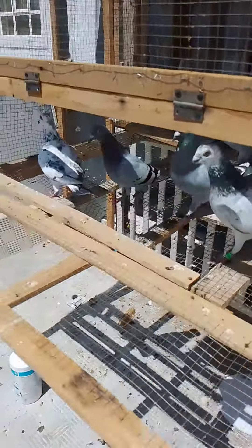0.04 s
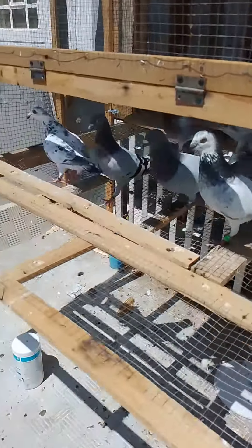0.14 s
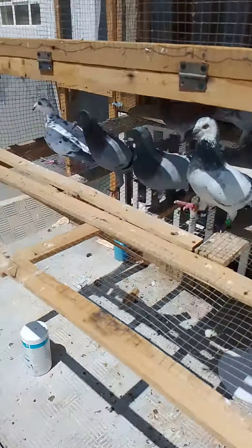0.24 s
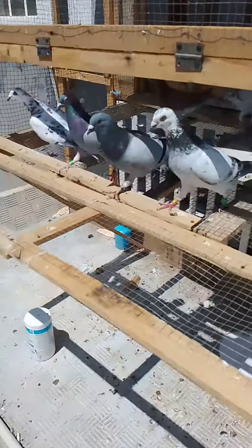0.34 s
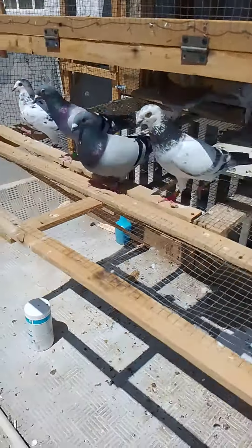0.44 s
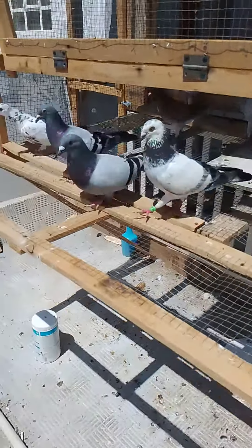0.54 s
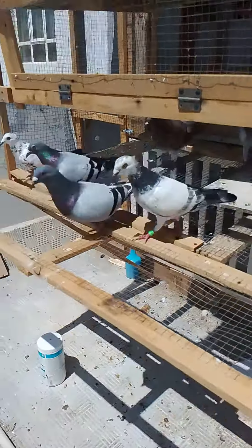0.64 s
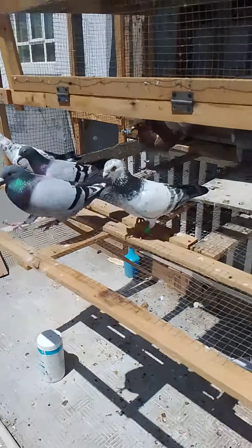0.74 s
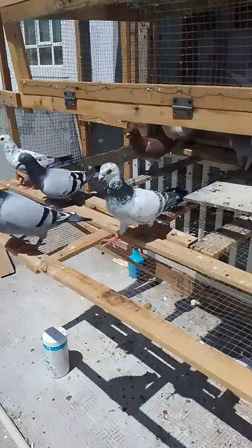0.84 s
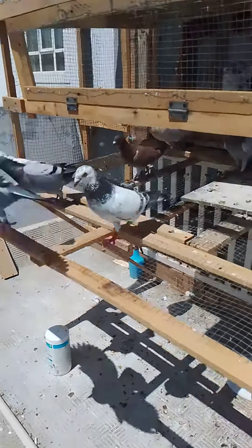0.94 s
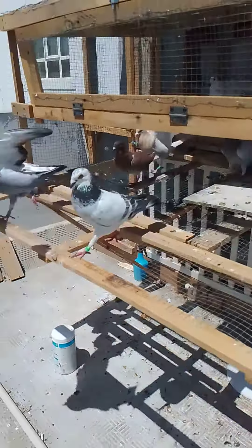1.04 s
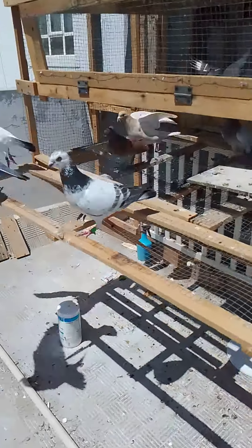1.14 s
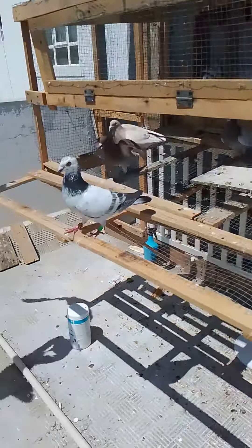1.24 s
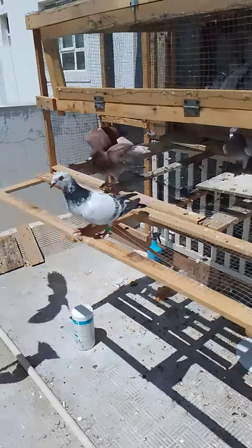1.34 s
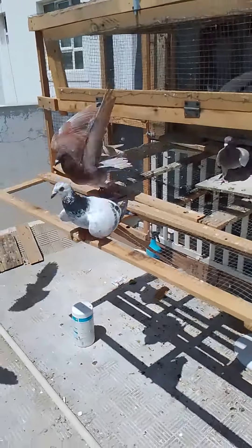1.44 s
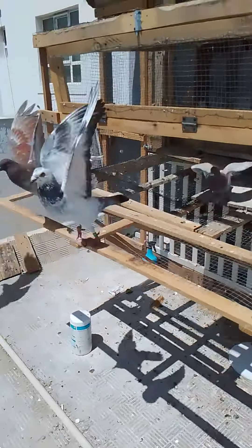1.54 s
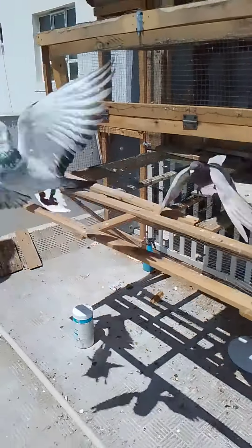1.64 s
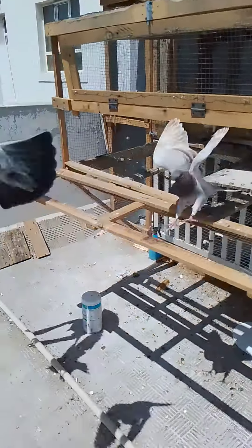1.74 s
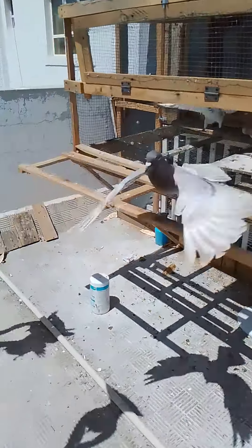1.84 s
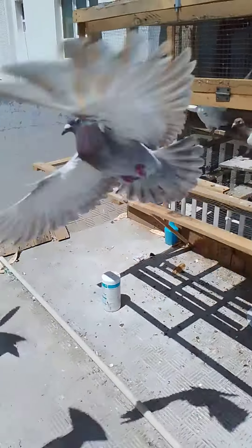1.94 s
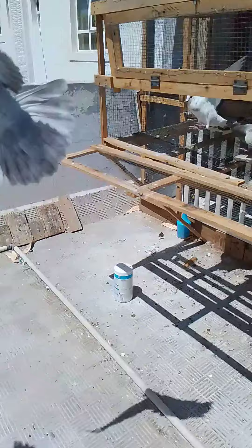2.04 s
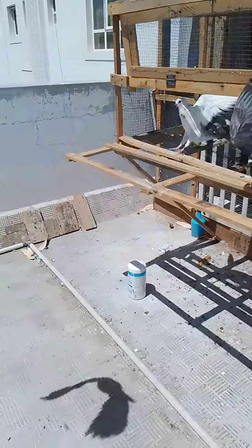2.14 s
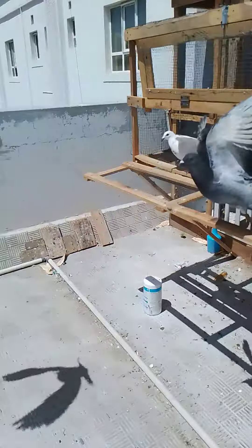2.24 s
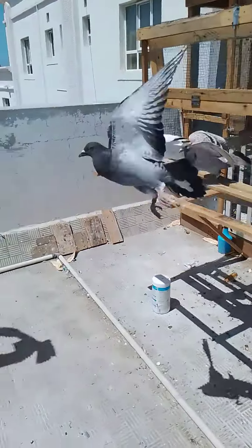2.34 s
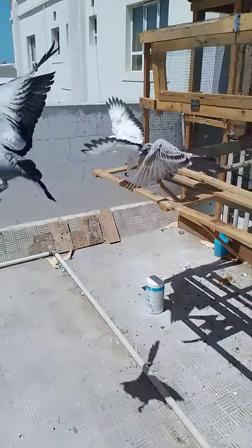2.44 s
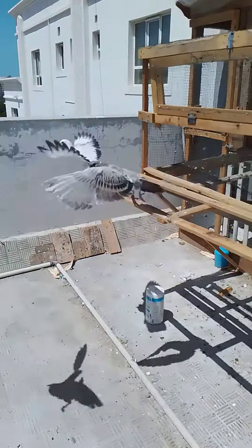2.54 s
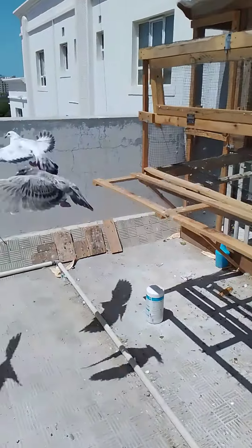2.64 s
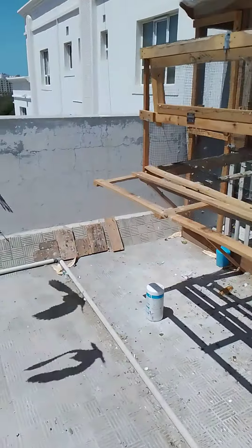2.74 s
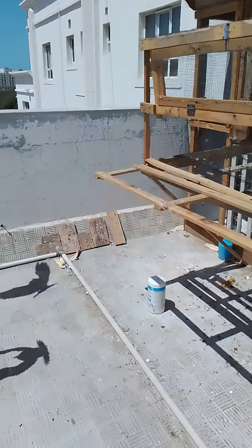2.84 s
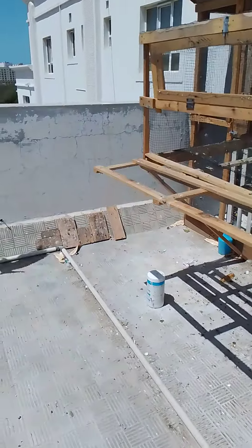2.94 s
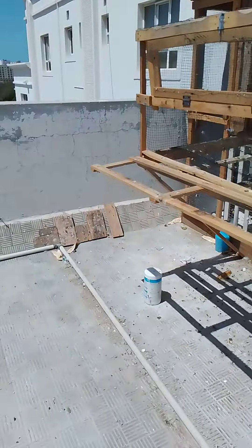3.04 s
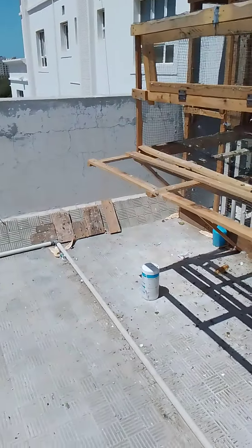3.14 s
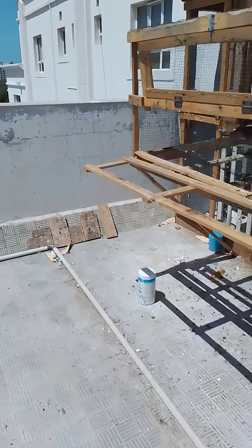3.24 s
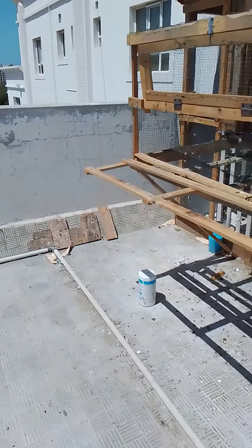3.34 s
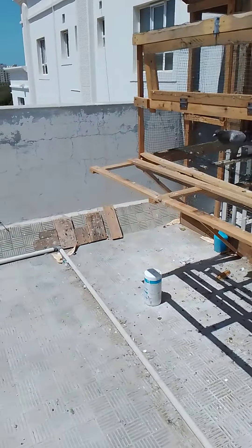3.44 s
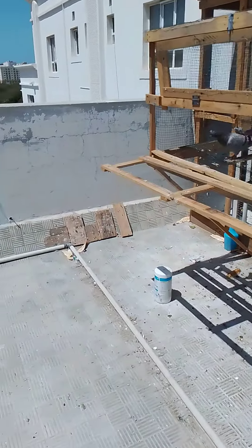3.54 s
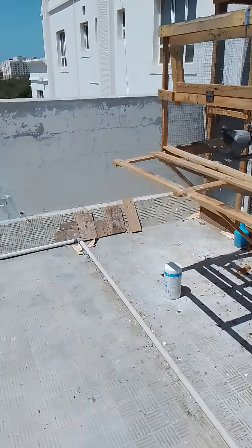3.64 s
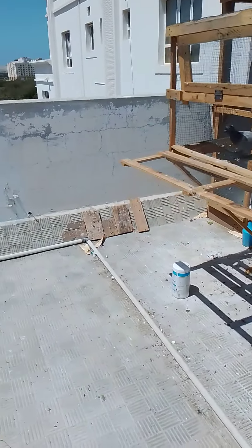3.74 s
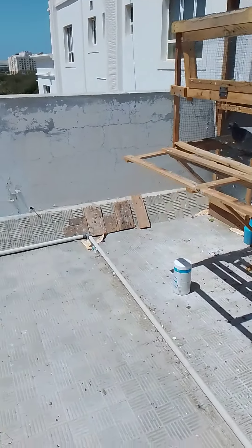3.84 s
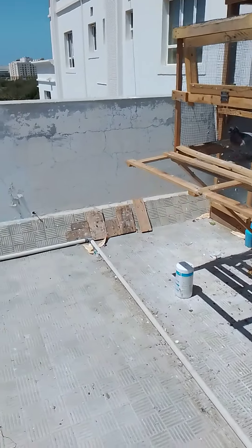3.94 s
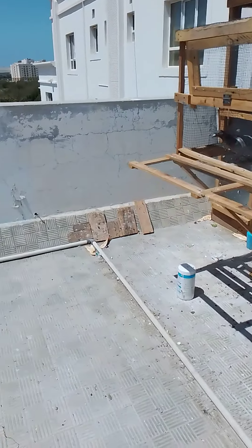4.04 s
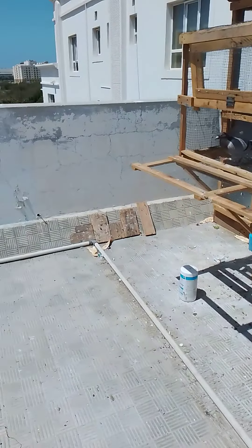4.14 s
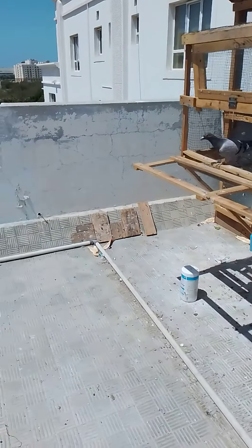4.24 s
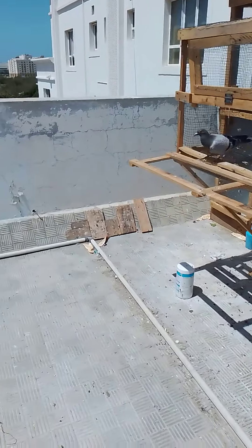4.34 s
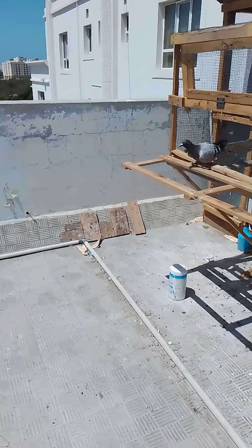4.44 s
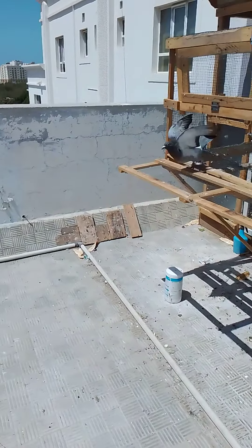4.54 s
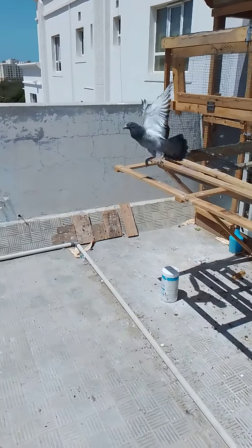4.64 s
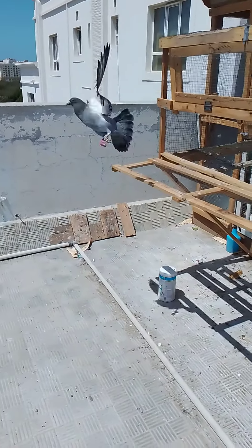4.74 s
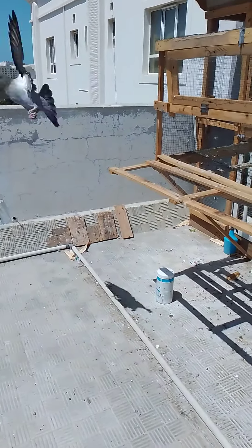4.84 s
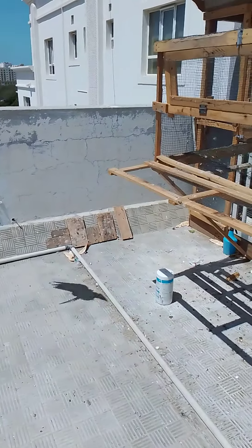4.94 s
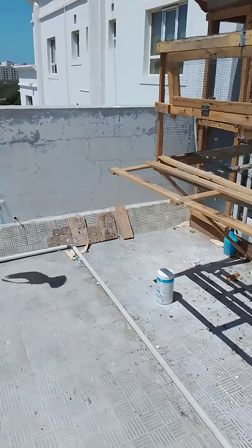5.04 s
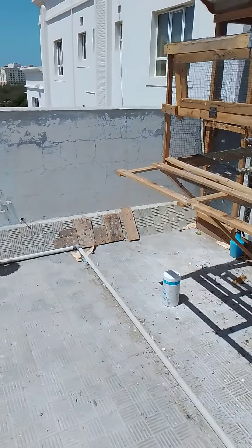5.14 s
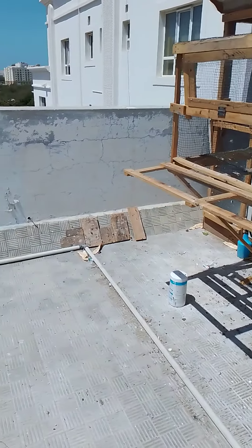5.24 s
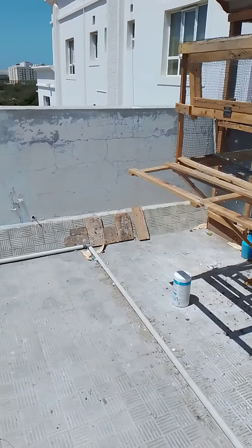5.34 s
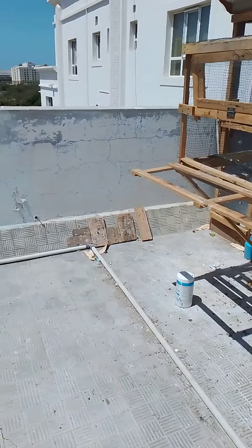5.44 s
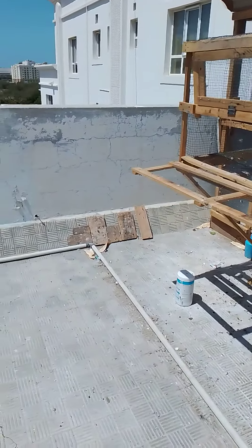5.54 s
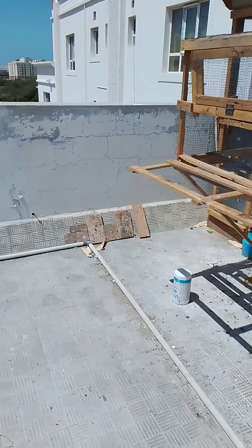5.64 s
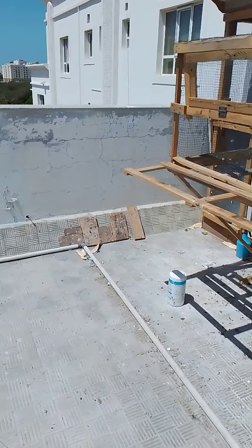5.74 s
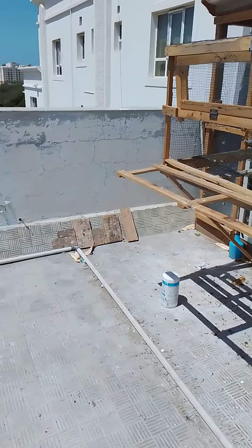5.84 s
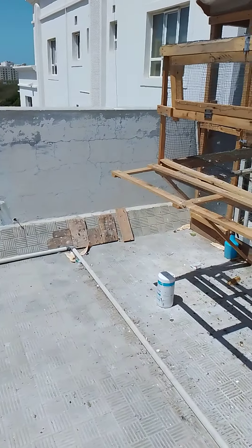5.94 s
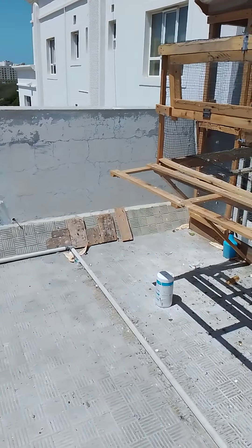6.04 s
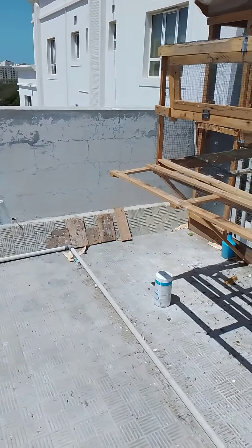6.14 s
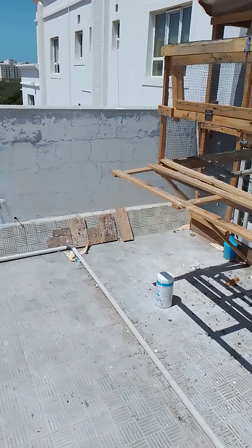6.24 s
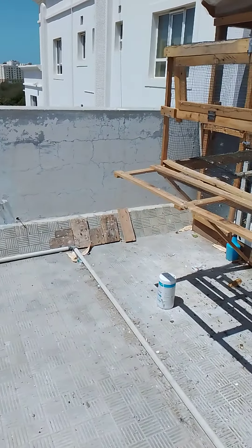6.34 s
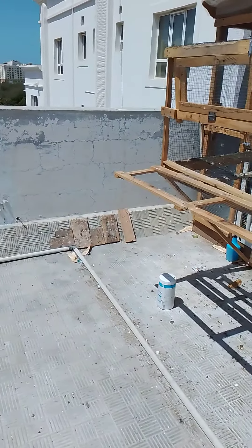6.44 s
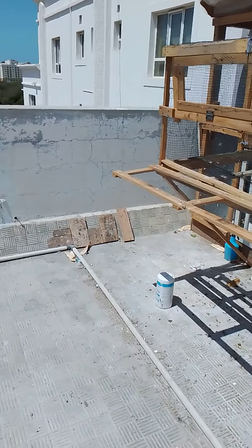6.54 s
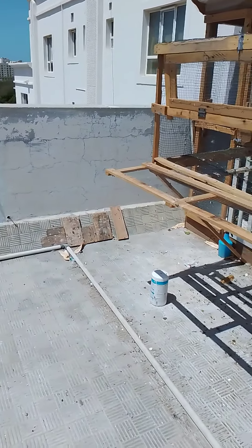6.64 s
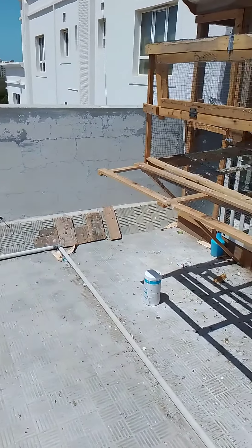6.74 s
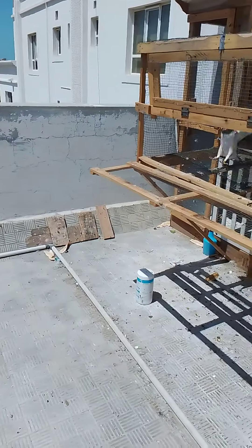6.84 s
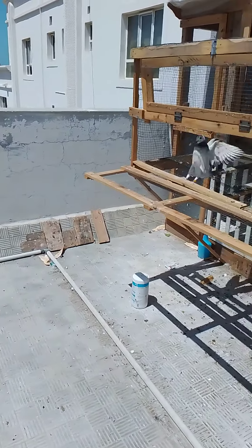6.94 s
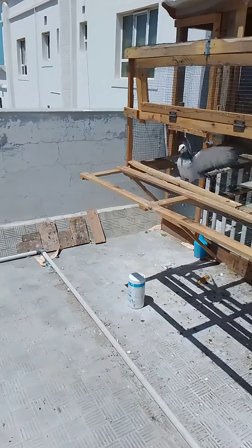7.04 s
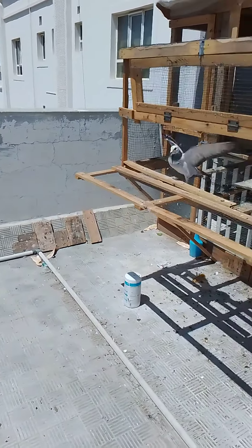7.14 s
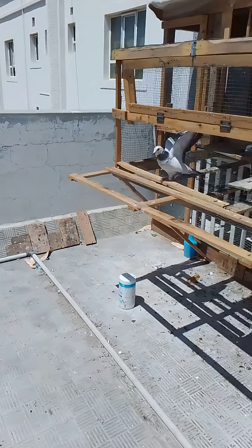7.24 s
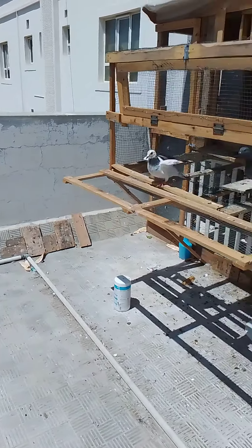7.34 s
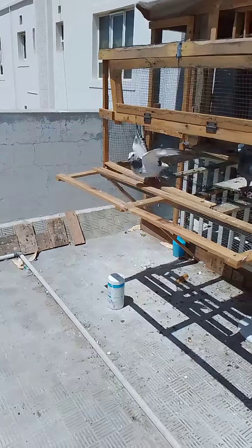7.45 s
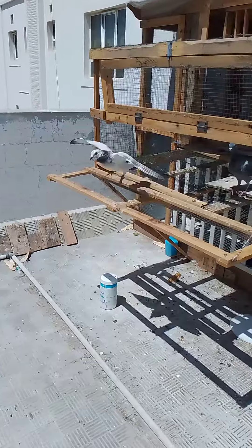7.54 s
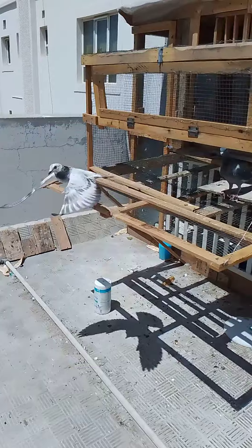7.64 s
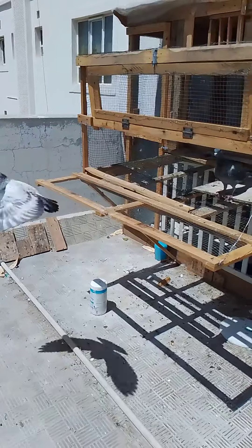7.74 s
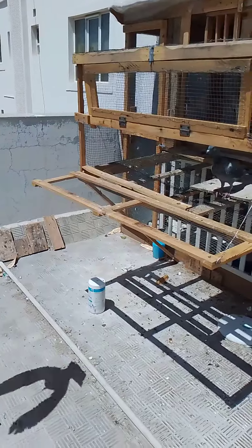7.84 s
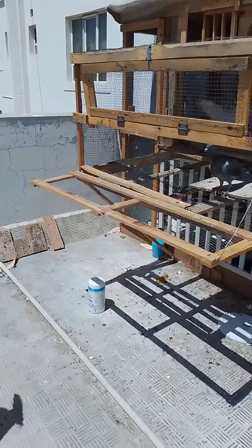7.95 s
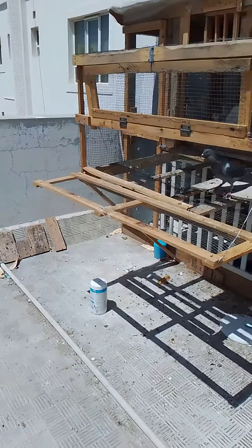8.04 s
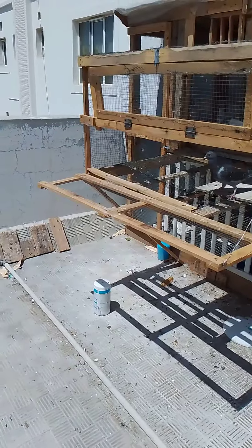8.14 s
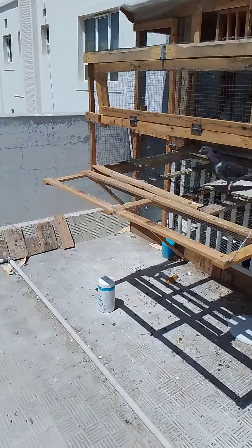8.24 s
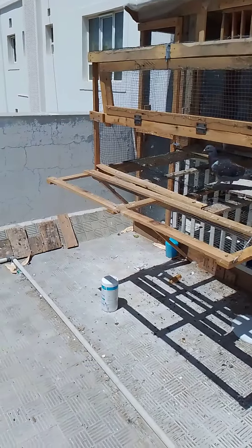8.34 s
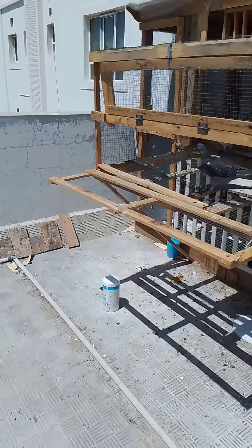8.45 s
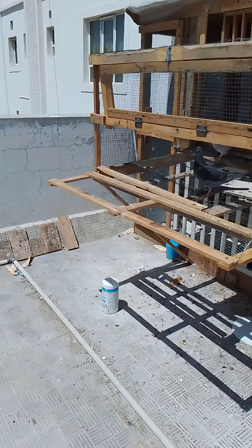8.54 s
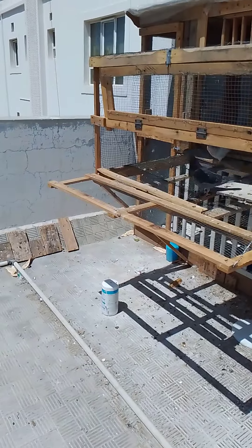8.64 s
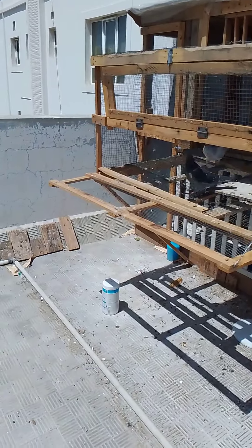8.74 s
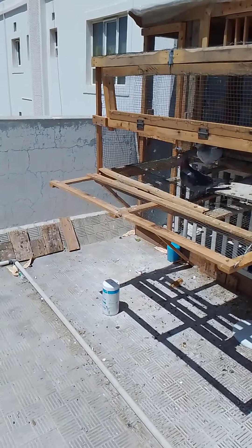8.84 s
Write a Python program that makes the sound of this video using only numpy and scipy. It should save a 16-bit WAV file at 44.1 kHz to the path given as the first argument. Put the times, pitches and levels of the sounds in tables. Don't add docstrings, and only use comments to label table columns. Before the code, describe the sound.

Pigeons burst from a wooden rooftop loft with sharp wing claps and feathery swishes, thin out, then one last bird claps past close by.

```python
import sys
import numpy as np
from scipy import signal
from scipy.fft import rfft, irfft
from scipy.io import wavfile

SR = 44100
rng = np.random.default_rng(int(sys.argv[2]) if len(sys.argv) > 2 else 0)


def generate_wav(signal):
    frames = np.transpose(np.atleast_2d(signal))
    scaled = np.clip(frames, -1, 1) * 32767
    pcm = np.round(scaled).astype(np.int16)
    wavfile.write(sys.argv[1], SR, pcm)


def field_ratio(decibels):
    return 10 ** (np.asarray(decibels, dtype=float) / 20)


N = 392931


def rms_one(x):
    return x / np.sqrt(np.mean(x ** 2) + 1e-20)


def in_time(rows):
    s, *columns = np.transpose(rows)
    return [np.interp(np.arange(N) / SR, s, c) for c in columns]


def band(x, low_hz, high_hz, order=2):
    return signal.sosfilt(signal.butter(order, [low_hz, high_hz], "band", fs=SR, output="sos"), x)


def coloured(x, points, size=8192):
    hz = np.maximum(np.arange(size // 2 + 1) * SR / size, 1)
    point_hz, point_db = np.array(points)[:, 0], np.array(points)[:, 1]
    log_gain = np.log(field_ratio(np.interp(np.log(hz), np.log(point_hz), point_db)))
    cepstrum = irfft(log_gain)
    cepstrum[1:size // 2] *= 2
    cepstrum[size // 2 + 1:] = 0
    response = irfft(np.exp(rfft(cepstrum)))
    response = response.reshape((1,) * (x.ndim - 1) + (-1,))
    return signal.fftconvolve(x, response, axes=-1)[..., :x.shape[-1]]


def drift(rate_hz):
    r = np.exp(-80 * np.pi * rate_hz / SR)
    slow = signal.lfilter([1], [1, -2 * r, r * r], rng.standard_normal(N // 40 + 2002))[2000:]
    return np.interp(np.arange(N) / 40, np.arange(len(slow)), rms_one(slow))


def resonance(x, hz, width_hz):
    r = np.exp(-np.pi * width_hz / SR)
    poles = [1, -2 * r * np.cos(2 * np.pi * hz / SR), r * r]
    return signal.lfilter([(1 - r * r) / 2, 0, (r * r - 1) / 2], poles, x)


def add(out, s, sound):
    at = round(s * SR)
    out[at:at + len(sound)] += sound[:N - at]


# frequency in Hz, density in dB per Hz.
PLUMAGE_TONE = [(110, -65), (190, -9.5), (233, -2.5), (302, 1.5), (671, -5), (1010, 1.5), (1550, 1.5),
                (2800, 3.5), (4050, -2), (4790, -10.5), (5460, -11), (7340, -22.5), (9340, -19),
                (12300, -31.5), (16000, -31)]


def plumage(x):
    return coloured(x, PLUMAGE_TONE)


# time in seconds, rush in dB, nearness in dB.
FLOCK_EFFORT = [(0.0, -38.5, 0.5), (0.79, -37, 3), (0.97, -37, 2.5), (1.29, -29, 1), (2.21, -28.5, 0.5),
                (3.38, -37.5, -1.5), (3.8, -37.5, 1), (4.0, -40.5, -1), (4.27, -41.5, -1.5),
                (4.57, -40.5, 1.5), (4.86, -38.5, -1), (5.58, -36, 0), (6.16, -40, -1.5), (7.62, -39, -0.5),
                (7.84, -37, 1), (8.22, -34.5, 0), (8.61, -38.5, -2), (8.91, -36, -1)]
CALM_DB = -39
# low edge in Hz, high edge in Hz, centre in Hz.
RUSH_ZONES = [
    (190, 800, 390),
    (800, 4500, 1900),
    (4500, 16000, 7000),
]


def rush():
    mid_db, near_db = in_time(FLOCK_EFFORT)
    effort_db = mid_db - CALM_DB
    thrust_db = -46.5 + effort_db - 0.68 * near_db
    hiss_db = -59 + 1.44 * effort_db + near_db
    slips = rng.random((2, N)) < 500 / SR
    rustle = slips * field_ratio(4.4 * np.minimum(rng.exponential(1, (2, N)), 3.5))
    white = rng.standard_normal((2, N)) * (1 + 1.34 * signal.lfilter([.2], [1, -.9], rustle))
    white = plumage(white)
    beats = np.minimum(drift(38), 1.2)
    zone_db = []
    for level_db, (low, high, _) in zip([thrust_db, mid_db, hiss_db], RUSH_ZONES):
        power = np.mean(band(white[0], low, high, order=4) ** 2)
        zone_db.append(level_db - 10 * np.log10(power))
    log_centres = np.log(np.array(RUSH_ZONES)[:, 2])
    out, edges = 0, np.geomspace(190, 17000, 15)
    for k in range(14):
        place = np.interp(np.log(edges[k] * edges[k + 1]) / 2, log_centres, [0, 1, 2])
        level_db = sum(max(0, 1 - abs(place - zone)) * zone_db[zone] for zone in range(3))
        flutter_db = (0.5 + 0.18 * k) * beats + 1.03 * np.clip(drift(42.0), -3, 1.8)
        out = out + field_ratio(level_db - 2.0 + flutter_db) * band(white[k % 2], *edges[k:k + 2])
    return out


def quills():
    per_second, cycles = 300, 11
    born = (rng.random(N) < per_second / SR) * rng.standard_normal(N)
    pitches, dealt = np.geomspace(550, 2200, 12), rng.integers(0, 12, N)
    buzz = 0
    for k, hz in enumerate(pitches):
        struck = born * (dealt == k) + 1e-18
        buzz = buzz + resonance(resonance(struck, hz, hz / cycles), hz, hz / cycles)
    return field_ratio(-60 + 2.0 * (in_time(FLOCK_EFFORT)[0] - CALM_DB)) * rms_one(buzz)


# frequency in Hz, density in dB per Hz.
TOWN_TONE = [(110, -42.5), (190, -7), (318, -1.5), (351, -8.5), (737, -3.5), (1000, -4), (1180, -1.5),
             (2400, -15), (9000, -59), (11700, -96), (19800, -120)]


def town():
    return field_ratio(-45.5) * rms_one(coloured(rng.standard_normal(N), TOWN_TONE))


# time in seconds, level in dB.
RUMBLE_SWELL = [(0.0, -60), (0.62, -62), (2.01, -52), (4.52, -64), (5.53, -57), (5.73, -64.5),
                (7.67, -62.5), (7.82, -55), (8.91, -64)]
# frequency in Hz, density in dB per Hz.
RUMBLE_TONE = [(13, -40), (22, -27), (59, -4), (81, -3.5), (124, -5.5), (156, -12), (165, -2), (210, -41),
               (360, -120)]


def rumble():
    deep = coloured(rng.standard_normal(N), RUMBLE_TONE + [(230, -44.0)])
    return field_ratio(in_time(RUMBLE_SWELL)[0]) * rms_one(deep)


def claps(rows, size=6000):
    out, t = np.zeros(N), np.arange(size) / SR
    noise, tips = rng.standard_normal((len(rows), 2, size)), rng.random((len(rows), 8))
    shapes = np.zeros((len(rows), size))
    for k, (s, peak_db, ring_hz, snap_db, swish_db, ring_db) in enumerate(rows):
        tip_at = (tips[k, :4] * .005 * SR * [0, 1, 1, 1]).astype(int)
        cracks = np.zeros(size)
        cracks[tip_at] = field_ratio(-(1.5 + 11 * tips[k, 4:]) * [0, 1, 1, 1])
        swish = noise[k, 0] * field_ratio(swish_db - 10.0) * np.exp(-t / 0.02) * (1 - np.exp(-t / 0.00029))
        source = cracks + swish + 0.2 * noise[k, 1] * np.exp(-t / 0.0014)
        ring = resonance(source, ring_hz, 3000)
        ring = ring + field_ratio(ring_db) * resonance(source - 0.18 * swish, ring_hz, 280)
        snap = band(source - swish * (1 - np.exp(-t / 0.051)), 3600, 17000)
        shapes[k] = band(source, 220, 6200, order=1) + 0.53 * ring + field_ratio(snap_db + 21.5) * snap
    shapes = plumage(shapes)
    shapes /= np.abs(band(shapes, 1860, 13000)[:, :400]).max(axis=1, keepdims=True)
    for row, shape in zip(rows, shapes):
        add(out, row[0], field_ratio(row[1] - 2.0) * shape)
    return out


# start in seconds, peak in dB, ring of the cupped wing in Hz, snap in dB.
FLOCK_CLAPS = [(0.0277, -28, 2810, -20), (0.0547, -24, 2290, -48), (0.2148, -27, 2820, -30),
               (0.477, -23, 2470, -36), (0.977, -18.5, 3020, -44), (1.047, -23.5, 1640, -44),
               (1.1136, -14, 1720, -27), (1.14, -16, 2780, -33), (1.2112, -5.5, 2760, -13.5),
               (1.224, -10, 940, -30), (1.3292, -10, 2700, -30), (1.495, -10.5, 3160, -12.5),
               (1.5503, -24, 2070, -34), (1.5899, -20, 1380, -36), (1.8067, -18, 2100, -25),
               (1.86, -20.5, 1910, -26), (2.018, -31, 1910, -35), (2.149, -19, 2800, -22),
               (2.163, -15, 2360, -14), (2.282, -18, 1010, -23), (2.3266, -21, 940, -20),
               (2.388, -31, 2810, -23), (2.5939, -17, 1610, -21), (2.6266, -19, 2000, -14),
               (2.6891, -22, 2090, -13), (2.7486, -21, 2950, -20), (2.9359, -18, 2800, -28),
               (1.6022, -19, 2280, -30), (1.6905, -21, 2900, -31)]
# start in seconds, peak in dB, ring in Hz, snap in dB, ring level in dB.
WIRE_KNOCKS = [(0.3705, -21, 2060, -42, 16.5), (0.535, -24, 2030, -34, 18), (0.905, -14.5, 2870, -45, 19),
               (1.375, -28, 2800, -35, 19), (1.668, -13.5, 2030, -19, 16), (1.6793, -15, 2940, -18, 17),
               (1.9406, -15.5, 2700, -35, 21), (2.4334, -36, 3440, -39, 22), (2.475, -14, 2900, -17, 18),
               (2.774, -13, 2870, -36, 13), (3.148, -25, 1610, -30, 14), (3.9211, -19, 2000, -21, 13),
               (4.746, -24, 1810, -18, 21), (4.774, -30, 1960, -27, 23), (4.849, -25, 1630, -20, 20),
               (5.578, -25, 2620, -25, 8), (7.788, -22, 2900, -13, 21), (8.035, -24.5, 1310, -20, 21),
               (8.2901, -10.5, 1930, -21, 21), (8.562, -25, 2020, -23, 14)]
# start in seconds, peak in dB, ring in Hz, snap in dB.
TIP_TICKS = [(1.6478, -12.5, 1110, -24), (1.684, -11, 1220, -20), (1.7824, -30, 2030, -26),
             (1.834, -17, 2490, -17), (1.9144, -15, 1940, -25), (1.968, -14, 1070, -30),
             (2.0265, -20, 1750, -30), (2.384, -10.5, 2840, -20), (2.528, -26, 2090, -16),
             (2.7795, -16.5, 2820, -35), (2.8167, -33, 3050, -22), (3.093, -20, 2250, -20),
             (3.0984, -17, 2730, -20), (3.2116, -25, 2900, -22), (4.6654, -28, 1570, -26),
             (4.6904, -21, 2830, -20), (5.169, -15.5, 2630, -24), (8.0833, -20, 2370, -25),
             (8.1845, -15, 2700, -25), (8.2932, -19, 2240, -19), (8.463, -26, 1540, -20),
             (8.5189, -27, 3450, -22), (8.6202, -19, 2550, -27)]
# start in seconds, peak in dB, ring in Hz, snap in dB.
STRAGGLER_CLAPS = [(2.984, -19, 3530, -16), (3.09, -10, 2240, -14.5), (3.2099, -11.5, 2820, -21.5),
                   (3.4117, -27, 2300, -14), (3.4163, -17.5, 2450, -25), (3.529, -25.5, 1230, -15),
                   (3.6425, -20, 1620, -15), (3.9533, -21, 1830, -23), (4.141, -33.5, 3200, -19),
                   (4.4876, -30, 1590, -15), (4.6896, -23, 2910, -16), (4.9049, -25, 3140, -20),
                   (4.952, -22.5, 1720, -16), (5.0585, -29.5, 1150, -9), (5.111, -27, 2180, -25),
                   (5.1706, -20, 2730, -12), (5.396, -16.5, 2260, -15), (5.446, -23.5, 1880, -30),
                   (5.499, -30, 1180, -29), (5.666, -22.5, 1680, -23), (6.805, -27, 2830, -19),
                   (7.403, -35, 2570, -29), (4.9125, -27, 2500, -28), (4.962, -39, 1900, -26)]
# start in seconds, peak in dB, ring in Hz, snap in dB.
LAST_BIRD_CLAPS = [(7.601, -24.5, 3000, -31), (7.655, -27, 3000, -39), (7.6869, -18, 3200, -15),
                   (7.7407, -24, 2440, -26), (7.829, -27, 3020, -13), (7.8625, -24, 1900, -24),
                   (7.979, -6, 1700, -22), (7.981, -16, 2930, -28), (8.081, -12.5, 2420, -17),
                   (8.1843, -9, 2800, -20.5), (8.381, -36, 2760, -29), (8.3978, -7, 2160, -26),
                   (8.5073, -10, 3500, -26), (8.619, -13, 2540, -11.5), (8.728, -21, 1970, -15),
                   (8.847, -18, 2250, -16), (8.891, -19, 2620, -22), (7.696, -34, 3520, -33),
                   (7.887, -23, 2400, -24)]
SWISH_AFTER = {"flock": -7.5, "stragglers": -4.5, "last": -12, "knocks": -7.5, "ticks": -21}


def wing_contacts():
    groups = [FLOCK_CLAPS, STRAGGLER_CLAPS, LAST_BIRD_CLAPS, WIRE_KNOCKS, TIP_TICKS]
    contacts = []
    for rows, group_db in zip(groups, SWISH_AFTER.values()):
        for s, peak_db, hz, snap_db, *ring in rows:
            swish_db = group_db - 0.53 * (peak_db + 15)
            ring_db = ring[0] if ring else 6.5
            contacts.append((s, peak_db, hz, snap_db, swish_db, ring_db))
    return claps(contacts)


# delay in seconds, level in dB.
WALL_SLAPS = [
    (.0045, -22),
    (.012, -31),
    (.022, -6.5),
    (.033, -22),
    (0.049, -15),
]


def walls():
    response, t = np.zeros(4000), np.arange(4000) / SR
    for (delay, level_db), noise in zip(WALL_SLAPS, rng.standard_normal((len(WALL_SLAPS), 4000))):
        smear = noise * np.exp(-np.maximum(t - delay, 0) / 0.0028) * (t >= delay)
        response += field_ratio(level_db) * smear / np.linalg.norm(smear)
    return response


# start in seconds, peak in dB, length in seconds.
LOFT_SWISHES = [(0.146, -26, 0.018), (0.576, -19, 0.0099), (5.908, -25.5, 0.047), (6.044, -27.5, 0.046),
                (6.168, -22.5, 0.028), (6.386, -25, 0.072), (6.498, -27.5, 0.029), (6.748, -24.5, 0.027),
                (7.006, -24, 0.032), (7.053, -38, 0.016), (7.126, -26, 0.026), (7.178, -24.5, 0.043),
                (7.279, -24, 0.018), (8.45, -25, 0.023), (0.035, -28, 0.014), (0.388, -17, 0.023),
                (0.489, -18, 0.015), (7.022, -24, 0.021), (7.064, -27, 0.02), (7.397, -24, 0.012),
                (7.591, -22, 0.069), (8.517, -19.5, 0.034), (8.635, -20, 0.019), (8.14, -21, 0.026),
                (1.893, -15, 0.036), (2.326, -14, 0.025), (2.49, -15, 0.018), (2.581, -15, 0.027),
                (5.012, -27, 0.03), (6.58, -30, 0.033), (8.31, -25, 0.04), (8.704, -34, 0.03)]


def swishes(size=6000):
    out, t = np.zeros(N), np.arange(size) / SR
    white = rng.standard_normal((len(LOFT_SWISHES), size))
    air = plumage(band(white, 1000, 21000, order=1))
    air = air + field_ratio(-37.0) * band(air, 4000, 22000)
    for (s, peak_db, length), sound in zip(LOFT_SWISHES, air):
        stroke = np.exp(-t / max(length, .005)) * (1 - np.exp(-t / 0.0032))
        add(out, s, field_ratio(peak_db - 12) * rms_one(sound) * stroke)
    return out


# start in seconds, peak in dB, ring in Hz, snap in dB.
TIP_CRACKS = [(1.1655, -30, 4500, -12), (1.3195, -15, 2900, -28), (1.3974, -26, 2570, -28),
              (1.438, -22, 3000, -12), (1.8818, -26, 1330, -30), (2.241, -18, 2890, -26),
              (2.23, -18, 2000, -30), (2.334, -17, 1210, -28), (2.879, -28, 1070, -28),
              (2.9857, -19, 5100, -18), (3.094, -15, 5300, -24), (3.2125, -16, 4900, -28),
              (3.4133, -19, 1800, -28), (3.4168, -11, 2750, -28), (5.3982, -16, 1250, -30),
              (5.4017, -20, 3100, -28), (5.4062, -23, 2300, -28), (5.512, -25, 1200, -19),
              (6.8142, -24, 2000, -28), (7.6883, -20, 4300, -27), (7.698, -23, 4160, -28),
              (7.7705, -28, 1010, -24), (7.9768, -9, 4200, -26), (7.9815, -11, 4100, -28),
              (7.99, -19, 2000, -30), (8.1858, -14, 4300, -24), (8.1975, -22, 3000, -18),
              (8.4004, -17.5, 4200, -32), (8.5084, -19, 5600, -22), (8.5125, -23, 3500, -26),
              (8.623, -24, 2490, -16), (0.981, -22, 4600, -20), (0.911, -19, 4000, -22),
              (4.509, -27, 1800, -18), (4.404, -33, 3200, -18), (4.243, -36, 3000, -18),
              (1.607, -18, 2300, -26), (1.6905, -15, 2900, -28), (7.0035, -29, 2600, -30),
              (7.028, -28, 2800, -24), (7.4015, -27, 2900, -24), (8.0855, -17, 2400, -26),
              (0.376, -19, 2300, -36), (0.381, -17, 2900, -36), (0.288, -33, 3000, -15),
              (0.718, -33, 2600, -17), (2.7815, -14, 3000, -34), (7.07, -29, 2700, -32),
              (6.826, -25, 1500, -36), (3.219, -19, 1500, -32)]


def tip_cracks():
    swish_db, ring_db = -19.5, 10
    return claps([(*row, swish_db, ring_db) for row in TIP_CRACKS])


# start in
# seconds, peak in dB.
MORE_DOWNSTROKES = [(2.783, -25), (3.239, -26.5), (4.902, -27), (5.095, -37), (7.396, -32), (7.748, -29),
                    (4.688, -36), (4.74, -31), (4.956, -36), (5.004, -32), (5.115, -34), (5.235, -32),
                    (2.86, -26.5), (2.93, -29.5), (2.96, -27), (3.29, -33), (3.53, -29), (0.6, -37), (0.875, -39),
                    (2.62, -31)]
# start in seconds, peak in dB,
# centre in Hz, length in seconds.
DOWNSTROKES = [(1.163, -33, 280, 0.036), (1.217, -13.5, 345, 0.013), (1.542, -24, 383, 0.016),
               (1.607, -27, 292, 0.061), (1.679, -17, 320, 0.0068), (1.834, -29, 473, 0.014),
               (1.936, -26, 396, 0.024), (2.05, -24, 595, 0.013), (2.122, -25.5, 457, 0.032),
               (2.24, -27, 563, 0.023), (2.345, -23, 390, 0.028), (2.379, -18, 366, 0.012),
               (2.448, -25.5, 334, 0.017), (2.546, -24, 344, 0.076), (3, -25, 346, 0.035),
               (3.072, -22, 380, 0.028), (3.204, -21.5, 320, 0.016), (3.837, -28, 620, 0.025),
               (3.845, -28, 300, 0.05), (4.83, -25, 340, 0.023), (5.029, -26, 390, 0.024),
               (5.392, -27, 360, 0.011), (6.81, -25, 360, 0.026), (7.864, -28, 395, 0.016),
               (7.977, -44, 700, 0.0088), (8.064, -23, 320, 0.028), (8.183, -27, 644, 0.018),
               (8.2885, -14, 480, 0.0036), (8.396, -11, 680, 0.0036), (8.502, -25.5, 540, 0.014),
               (0.805, -34.5, 825, 0.057), (0.91, -32, 800, 0.051), (1.02, -31, 790, 0.057),
               (1.05, -28, 1050, 0.015), (1.11, -19, 950, 0.0087)]


def thumps(size=6000):
    out, t = np.zeros(N), np.arange(size) / SR
    puff_hz, puff_s = 340, 0.029
    rows = DOWNSTROKES + [(s, peak_db, puff_hz, puff_s) for s, peak_db in MORE_DOWNSTROKES]
    for (s, peak_db, hz, length), noise in zip(rows, rng.standard_normal((len(rows), size))):
        puff = resonance(band(noise, 157, 2400), hz, 122)
        stroke = t / max(length, .004) * 2.88
        add(out, s, field_ratio(peak_db - 9.0) * rms_one(puff) * stroke * np.exp(1 - stroke))
    return out


# start in seconds, length in seconds, start pitch in Hz, end pitch in Hz, level in dB.
SHORT_TONES = [(1.576, 0.065, 739, 731, -39), (2.015, 0.032, 1090, 850, -32),
               (2.11, 0.03, 1060, 1110, -31), (2.082, 0.02, 1260, 1320, -36),
               (2.148, 0.028, 620, 550, -32), (2.05, 0.02, 640, 600, -35),
               (2.172, 0.02, 1230, 1190, -36), (2.008, 0.02, 1880, 1920, -36),
               (2.202, 0.032, 930, 1020, -31.5), (2.304, 0.043, 958, 946, -34.5),
               (2.431, 0.018, 3290, 3260, -30), (2.431, 0.019, 3550, 3530, -28),
               (5.826, 0.065, 2455, 2440, -43), (5.84, 0.09, 1470, 1474, -47),
               (6.812, 0.05, 870, 910, -41), (7.929, 0.012, 1280, 1310, -30),
               (4.825, 0.04, 5100, 4900, -55), (4.55, 0.056, 1150, 1134, -49)]


def short_tones():
    out, wobble = np.zeros(N), 1 + .004 * drift(90)
    for s, length, start_hz, end_hz, level_db in SHORT_TONES:
        over_db = -10.5 - 21.5 * np.log2(start_hz / 1000)
        part = np.linspace(0, 1, round(length * SR))
        hz = (start_hz + (end_hz - start_hz) * part) * wobble[round(s * SR):][:len(part)]
        phase = 2 * np.pi * np.cumsum(hz) / SR
        tone = np.sin(phase) + field_ratio(over_db) * (np.sin(2 * phase) + np.sin(3 * phase))
        add(out, s, field_ratio(level_db + 4.5) * tone * np.sin(np.pi * part) ** 0.94)
    flutter_db = 2.5 * np.clip(drift(120), -3, 1) - 1
    return band(out * field_ratio(flutter_db), 230, 12000)


# start in seconds, peak in dB.
TIP_BRUSHES = [(1.623, -27.5), (2.0433, -49), (2.0772, -34), (2.2557, -26.5), (3.272, -44), (3.756, -41.5),
               (3.88, -44), (4.631, -41.5), (4.799, -36), (5.286, -43), (5.5117, -40), (5.739, -41),
               (5.964, -42), (6.449, -42), (7.54, -47), (8.3549, -49), (8.6836, -40), (8.7944, -36),
               (8.037, -41), (8.141, -42), (8.252, -45), (8.37, -47), (7.399, -48), (7.469, -58),
               (7.491, -49), (6.585, -54), (6.653, -47), (6.712, -48), (6.885, -51), (5.012, -46),
               (3.41, -29), (5.239, -46), (5.366, -47), (5.623, -40), (6.299, -56), (7.131, -53),
               (7.56, -46), (7.625, -47)]


def brushes(size=3000):
    out, t = np.zeros(N), np.arange(size) / SR
    fade = np.exp(-t / 0.0031) + 0.5 * np.exp(-t / 0.026)
    fizz = rng.standard_normal((len(TIP_BRUSHES), size)) * fade
    for (s, peak_db), sound in zip(TIP_BRUSHES, plumage(band(fizz, 5200, 22000))):
        add(out, s, field_ratio(peak_db + 6.5) * sound / np.abs(sound).max())
    return out


def loft_front(bed):
    hollow = np.interp(np.arange(N) / SR, (.85, 1.15), [0.45, 0])
    return bed - hollow * resonance(bed, 593, 500)


def scene():
    bed = loft_front(rush() + town() + quills())
    near = wing_contacts() + tip_cracks() + short_tones() + brushes()
    echoes = signal.fftconvolve(band(near, 310, 5000, order=1), walls())[:N]
    air = band(thumps(), 200, 2900) + swishes() + rumble()
    return (near + field_ratio(-10) * echoes + air + bed)[None]


def top_cut(x):
    return signal.sosfilt(signal.butter(12, 16830, fs=SR, output="sos"), x)


def record(dry):
    notched = dry - resonance(dry, 169.4, 50)
    steep = signal.ellip(12, .5, 70, 15800, fs=SR, output="sos")
    mix = signal.sosfilt(steep, notched) + field_ratio(-38) * notched
    return top_cut(mix)


dry = scene()
out = record(dry)
generate_wav(out)
```